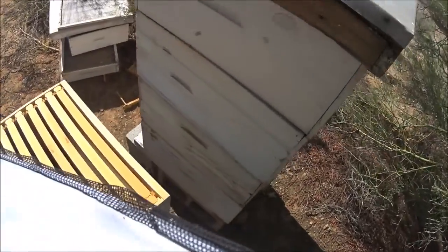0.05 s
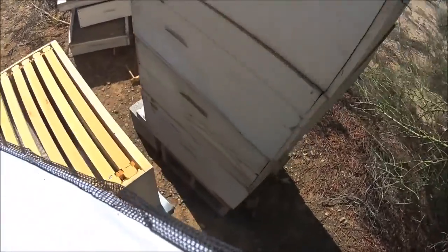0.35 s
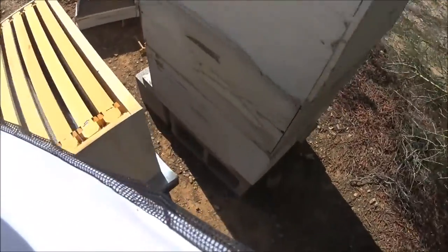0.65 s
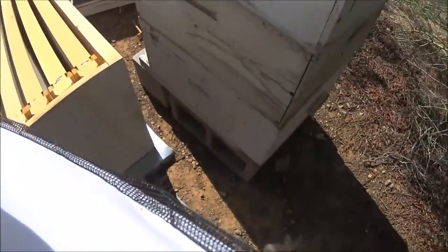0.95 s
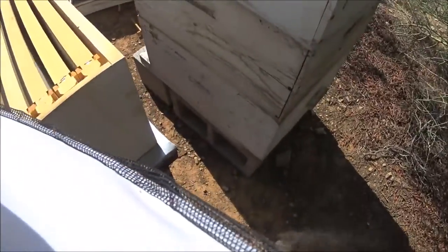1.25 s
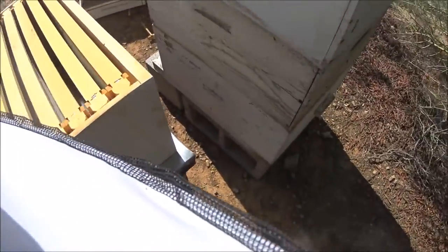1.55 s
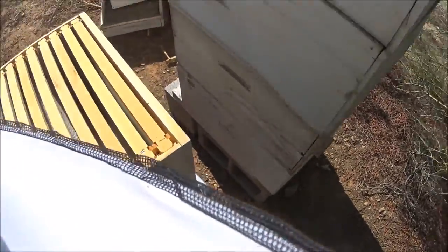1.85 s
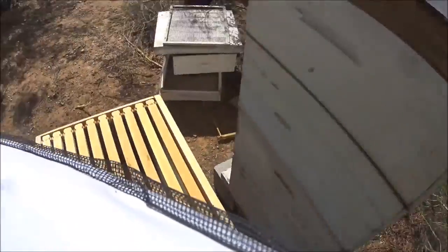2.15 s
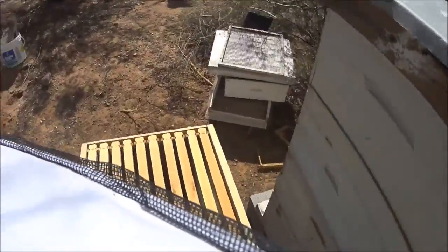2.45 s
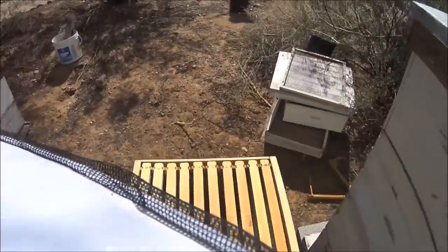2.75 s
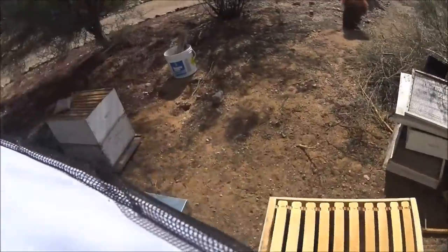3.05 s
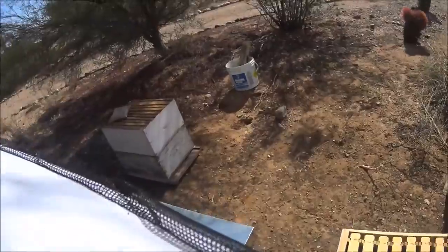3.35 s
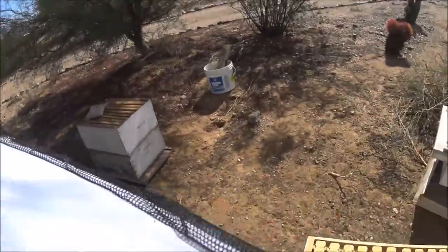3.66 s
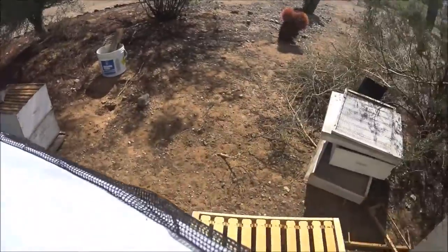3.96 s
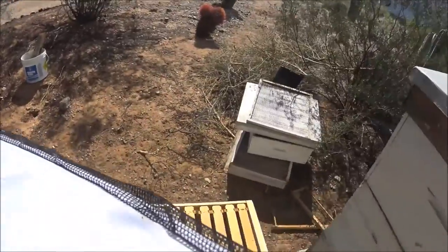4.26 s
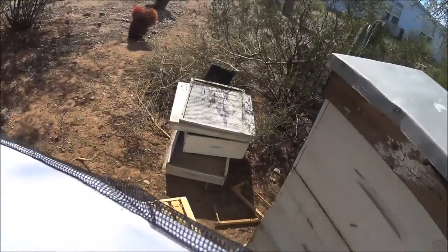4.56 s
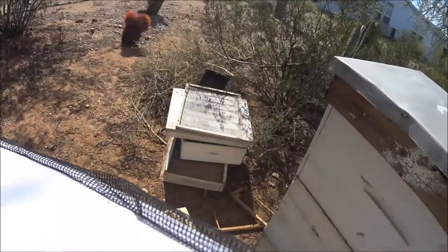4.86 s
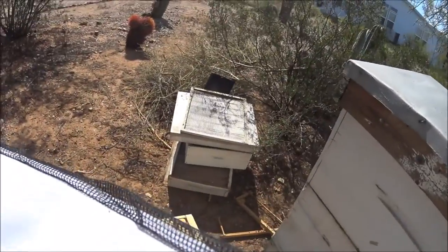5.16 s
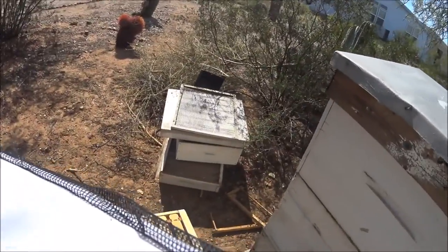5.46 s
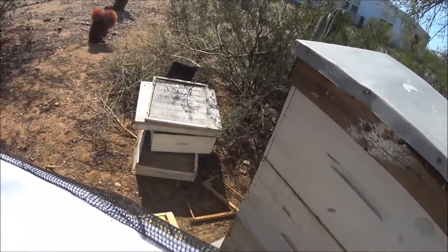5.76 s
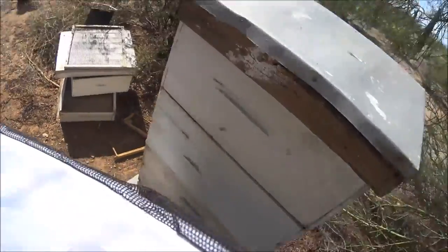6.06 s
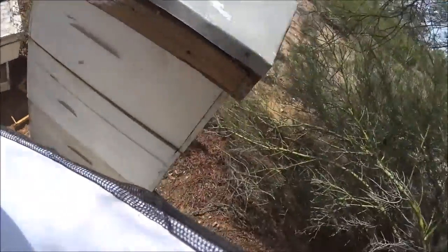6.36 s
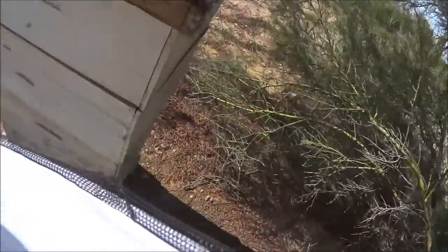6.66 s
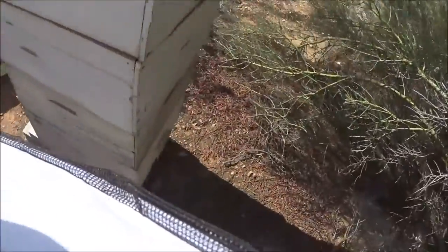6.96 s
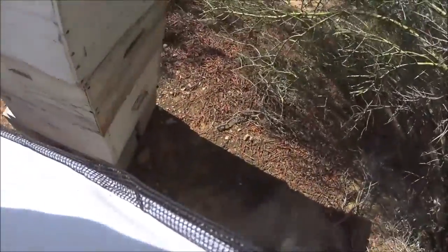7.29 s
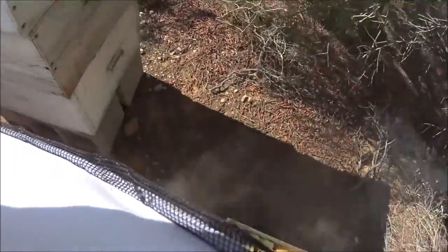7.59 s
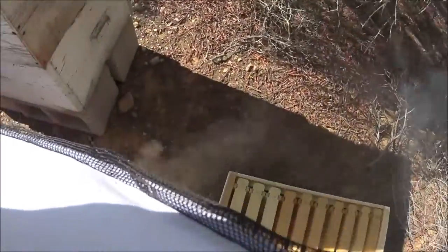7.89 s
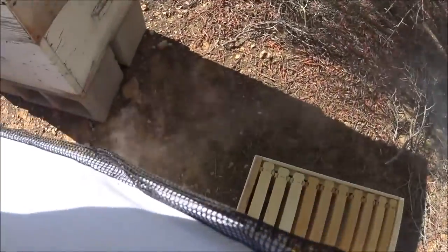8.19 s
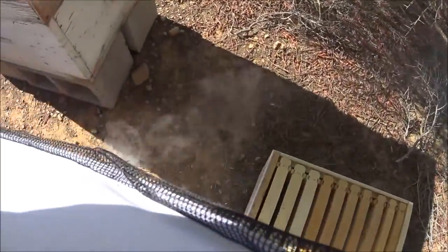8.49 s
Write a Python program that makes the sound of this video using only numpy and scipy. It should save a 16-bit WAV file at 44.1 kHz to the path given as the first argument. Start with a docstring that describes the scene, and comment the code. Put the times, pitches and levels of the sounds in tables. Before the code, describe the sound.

Loose wooden frames knock and scrape in a carried hive box, a suit rustles, and a bee smoker's bellows creak, whistle and puff.

```python
"""A suit rustles and loose frames knock in a wooden box, within arm's reach of the microphone.
A beekeeper is carrying it past the hives in dry, quiet country, with a faint hush all around.
The frames jostle and scrape, ringing the box; hard edges clack, grit snaps and a thin whine passes.
At the end, just as close, the bellows of a smoker creak and whistle, then drive a puff of air
through its can."""
import sys
import numpy as np
from scipy import signal
from scipy.fft import rfft, irfft
from scipy.io import wavfile
from scipy.ndimage import uniform_filter1d

SR = 44100
rng = np.random.default_rng(int(sys.argv[2]) if len(sys.argv) > 2 else 0)


def transcribe(signal):
    """Save signal, clipped to [-1, 1], as a 16-bit WAV file at the path in sys.argv[1]."""
    frames = np.atleast_2d(signal).T
    limited = np.clip(frames, -1, 1)
    pcm = np.round(limited * 32767).astype(np.int16)
    wavfile.write(sys.argv[1], SR, pcm)


N = 376173
TIME = np.arange(N) / SR

# Levels are relative: a source's own level_db is added to those in its table.
# spectra of the distant hush, the suit, the nozzle, an edge contact, the box's weak modes: f/Hz, level/dB
HUSH_SPECTRUM = [(20, 5), (50, -7.5), (100, -10), (200, -13), (400, -18.5), (900, -21), (1350, -19.5),
                 (2800, -23.5), (5500, -25), (11000, -30.5)]
CLOTH_SPECTRUM = [(400, -67), (1300, 11.5), (2000, 9.5), (3300, 3), (5500, 7.5), (8000, -1.5), (11000, -1)]
JET_SPECTRUM = [(100, -10), (190, 17), (300, -6), (950, 1.5), (1500, 9.5), (1950, 0), (2350, 9), (3000, 2),
                (6000, 0), (7000, -2.5), (8200, -14), (11000, -7.5)]
CRACK_SPECTRUM = [(100, -51), (250, 6), (700, -14.5), (1300, 6.5), (3200, 2), (4800, 4.5), (6200, 3),
                  (8000, -4.5), (11000, -3)]
RATTLE_SPECTRUM = [(30, -22), (70, -1), (180, -11.5), (290, -5), (450, -2), (800, -9), (1130, -16.5),
                   (2200, -21), (2900, -27), (5500, -26.5), (11000, -40)]
# stereo width at the microphone, for the hush and the close handling: f/Hz, side over mid/dB
HUSH_SIDE = [(40, -26), (200, -7), (600, 7.5), (2000, 4), (11000, -5)]
HANDLING_SIDE = [(40, -19.5), (250, -15.5), (560, -10.5), (1200, -6), (2000, -7.5), (4000, -8.5),
                 (11000, -7.5)]

# a passing whine, a dragged edge: t/s, hold/s, level/dB, first f/Hz, settled f/Hz, attack/s, release/s
PASSING_WHINE = (5.515, .075, -55, 7550, 7920, .03, .03)
EDGE_SQUEAK = (0.916, .018, -42, 2760, 2650, .014, .02)
# dry grit and twigs snapping: t/s, level/dB, decay/s
SNAPS = [(0.146, -39, 0.03), (0.904, -27.5, 0.011), (0.93, -21.5, 0.0067), (0.968, -24.5, 0.0064),
         (1.134, -36, 0.0034), (1.196, -38, .004), (1.248, -38, 0.0065), (1.34, -37, 0.0028),
         (1.283, -32, 0.0037), (3.687, -30.5, 0.0024), (3.704, -48, 0.0026), (6.433, -42, .003),
         (6.775, -36, .002), (7.654, -35, .002), (7.592, -36, 0.002), (7.699, -37.5, 0.0028),
         (8.092, -35.5, .003), (8.29, -31, 0.012), (8.372, -26, 0.0051), (8.416, -25, .002)]
# the suit rubbing as the arms swing: t/s at the height, level/dB, swell and fade/s
SUIT_RUBS = [(0.13, -44.5, 0.3), (0.31, -37, 0.024), (0.928, -27, 0.028), (1.24, -42.5, 0.18),
             (1.9, -49.5, .15), (4.55, -46, 0.13), (6.05, -49, 0.25), (6.52, -35, 0.068), (8.32, -32, 0.15)]

# air drawn softly through the smoker: t/s, level/dB
SMOKER_DRAUGHT = [(0.29, -44.5), (0.42, -51), (1.4, -52), (2.3, -54.5), (5.1, -60), (7.8, -54)]
# a light and a hard stroke of the bellows:
# t/s, length/s, level/dB, fade/(dB/s), first f/Hz, settled f/Hz, settling/s, hoarseness/dB
BELLOWS_STROKES = [(7.874, 0.41, -38.5, 18, 1504, 1360, 0.0383, -21),
                   (8.305, .25, -30, 32, 1338, 1500, 0.197, -13)]
# a soft and a hard puff: t/s, hold/s, jet level/dB, can level/dB
SMOKER_PUFFS = [(0.0, 0.33, -55.5, -64.5), (8.305, 0.07, -35, -39)]

# modes of the hard edges: f/Hz, level/dB, t60/s
EDGE_MODES = [(1038, -11, 0.07), (1400, -10, 0.15), (1600, -16, 0.3), (1760, -5, 0.072), (2475, 0.5, 0.055),
              (2550, -9, 0.19), (3640, -10, 0.078), (4550, 0, 0.056), (4680, 2, 0.04), (4820, -14, 0.11),
              (4840, -2, 0.06), (5200, -3, 0.066), (5700, -5, 0.071)]
# edges striking: t/s, level/dB, rattle/s, lowpass f/Hz, freedom to ring/dB
EDGE_CLACKS = [(0.334, -16, 0.0026, 1990, -19), (0.341, -20.5, 0.0027, 2000, -25),
               (0.925, -24.5, 0.01, 4000, -9), (5.334, -26, 0.0043, 9000, -4),
               (5.346, -20.5, 0.0049, 9000, 0), (5.381, -21, 0.005, 9000, -5),
               (5.3851, -7, 0.0016, 12000, 0.5), (5.391, -19, 0.0017, 12000, -5),
               (5.409, -14.5, 0.0016, 12000, -4), (5.593, -19.5, 0.015, 5000, 3),
               (5.604, -21.5, 0.02, 2800, 6.5), (8.324, -15.5, 0.011, 9000, -14),
               (8.416, -17.5, 0.0021, 12000, -12)]
# resonances of the hollow walls, and of the box with its frames: f/Hz, width/Hz, level/dB
WALL_MODES = [(390, 35, -3.5), (662, 30, 11.5), (925, 51, -8), (1325, 55, -2), (1710, 70, -5)]
BOX_MODES = [(91, 71, 2), (192.2, 48, 8), (402.4, 15, -1.5), (522, 44, 2.5), (655, 47.5, -1),
             (929, 83, -2.5), (1358, 62, -5.5), (1662, 106, -7.5), (2383, 200, -19)]
# the box shuddering: t/s, level/dB, hold/s
BOX_SHUDDERS = [(2.956, -28, 0.048), (3.691, -39, 0.036), (4.42, -35.5, 0.016)]
# wood sliding on wood: t/s, length/s, level/dB, attack/s
FRAME_SLIDES = [(0.488, 0.076, -42, 0.024), (0.603, 0.04, -40, 0.017), (1.785, 0.51, -54, 0.049),
                (2.775, 0.17, -50.5, 0.037), (2.9, 0.079, -34.5, 0.055), (3.043, 0.13, -44.5, 0.025),
                (3.55, 0.21, -38, 0.11), (3.766, 0.21, -41, 0.067), (4.114, 0.18, -47, 0.1),
                (4.332, 0.16, -47, 0.028), (5.302, 0.15, -50, 0.056), (5.478, 0.16, -50.5, 0.042),
                (5.894, 0.2, -40, 0.15), (6.135, 0.71, -50.5, 0.046), (6.732, 0.055, -51, 0.074),
                (7.488, 0.67, -54.5, 0.076)]
# frames jolting in the box: t/s, level/dB, treble gain/dB, rattle/s
FRAME_JOLTS = [(0.121, -32, 0, 0.022), (0.518, -28.5, 2, 0.023), (0.635, -29.5, 9, 0.0036),
               (0.806, -26.5, 2.5, 0.028), (0.862, -30, -14, 0.0064), (1.037, -33.5, -2, 0.04),
               (1.086, -27.5, 18, 0.0042), (1.222, -35, -29, 0.0043), (1.644, -35, -3, 0.01),
               (1.671, -29.5, 3, 0.028), (1.712, -39.5, 5, 0.0035), (1.825, -30, 1.5, 0.02),
               (1.851, -31, 6, 0.02), (1.898, -31, 2.5, 0.018), (1.942, -29, 1, 0.0079),
               (2.61, -32.5, -5, 0.01), (2.934, -27.5, 8, 0.03), (2.966, -29, 19, 0.013),
               (3.064, -36, -11, 0.016), (3.127, -29.5, -21, 0.0042), (3.22, -39, -13, .007),
               (3.33, -32, 8, 0.008), (3.348, -30.5, -2.5, .023), (3.607, -31, -10, 0.009),
               (3.63, -30, 5, 0.0047), (3.686, -26, 4, 0.0065), (3.701, -25, 4, 0.0076),
               (3.829, -27.5, 10, .022), (3.955, -33.5, 4, 0.011), (3.994, -26, -2, 0.0047),
               (4.071, -32.5, -4, 0.007), (4.328, -29, -10, 0.027), (4.419, -25, 1, 0.014),
               (4.443, -36, -4, 0.0075), (5.228, -41, -14, 0.004), (5.284, -36, -10, 0.016),
               (5.935, -33.5, 1, 0.0073), (6.665, -30.5, 1.5, 0.0084), (6.789, -30.5, -27, 0.039),
               (7.181, -36.5, -4, 0.019), (7.343, -42, 7, 0.0078), (7.486, -32, 12, 0.019),
               (7.525, -27.5, -1.5, 0.027), (7.575, -36, 13, 0.0073), (7.717, -38.5, -11, 0.0042),
               (7.761, -28, 4, 0.029), (7.922, -32, 6, 0.016), (8.054, -35, 17, 0.014)]


def from_db(db):
    """Decibels to gain."""
    return 10 ** (np.asarray(db) / 20)


def rms_one(x):
    """Scale to unit power."""
    return x / np.sqrt(np.mean(x ** 2) + 1e-20)


def loudest_one(x, size=512):
    """Scale a hit so that its loudest moment has unit power."""
    return x / np.sqrt(uniform_filter1d(x ** 2, size).max())


def add(track, s, sound):
    """Mix a sound into a track at time s."""
    at = max(0, int(s * SR))
    track[at:at + len(sound)] += sound[:max(0, N - at)]


def pan(x, db):
    """Place a sound by the level of left over right."""
    return x * from_db(np.array([[db], [-db]]) / 2)


def envelope(s, hold_s, attack_s, release_s):
    """Rises from time s, holds until hold_s later, then dies away."""
    t = TIME - s
    return np.clip(t / attack_s, 0, 1) * np.exp(-np.maximum(t - hold_s, 0) / release_s)


def glide(s, first_hz, settled_hz, settle_s):
    """A pitch that eases from its first value to its settled one."""
    return settled_hz + (first_hz - settled_hz) * np.exp(-np.maximum(TIME - s, 0) / settle_s)


def drift(rate_hz):
    """Smooth random wander of spread 1, drawn every 40 samples."""
    r = np.exp(-80 * np.pi * rate_hz / SR)
    slow = signal.lfilter([1], [1, -2 * r, r * r], rng.standard_normal(N // 40 + 2002))[2000:]
    return np.interp(np.arange(N) / 40, np.arange(len(slow)), rms_one(slow))


def colour(x, spectrum, size=8192):
    """Causal (minimum-phase) filter that follows a spectrum."""
    hz, db = np.transpose(spectrum)
    grid_hz = np.maximum(np.arange(size // 2 + 1) * SR / size, 1)
    gain = from_db(np.interp(np.log(grid_hz), np.log(hz), db))
    cepstrum = irfft(np.log(gain))
    cepstrum[1:size // 2] *= 2
    cepstrum[size // 2 + 1:] = 0
    impulse = irfft(np.exp(rfft(cepstrum)))[:size // 2]
    return signal.oaconvolve(x, impulse)[:len(x)]


def resonate(x, hz, width_hz):
    """One resonance with gain 1 on top."""
    r = np.exp(-np.pi * width_hz / SR)
    poles = [1, -2 * r * np.cos(2 * np.pi * hz / SR), r * r]
    return signal.lfilter(np.array([1, 0, -1]) * (1 - r * r) / 2, poles, x + 1e-18)


def ring_modes(x, modes):
    """Resonances driven together, in alternating polarity."""
    return sum((-1) ** k * from_db(db) * resonate(x, hz, width) for k, (hz, width, db) in enumerate(modes))


def noise_band(hz, widths_hz):
    """Unit-power noise through two resonances in series."""
    first = resonate(rng.standard_normal(N), hz[0], widths_hz[0])
    return rms_one(resonate(first, hz[1], widths_hz[1]))


def grains(per_s, spread_db):
    """Tiny contacts at random moments and of uneven size."""
    sizes = from_db(spread_db * np.minimum(rng.exponential(1, N), 4)) * rng.choice([-1, 1], N)
    return rms_one(sizes * (rng.random(N) < per_s / SR))


def open_air(level_db=-54.5, rumble_db=-60.0, gust_db=3.0):
    """The steady hush of open country, with a low rumble of moving air."""
    hush = from_db(level_db) * rms_one(colour(rng.standard_normal(N), HUSH_SPECTRUM))
    gusts = from_db(rumble_db + gust_db * drift(4.7))
    return hush + gusts * noise_band(hz=(66, 38), widths_hz=(72, 112))


def thin_tone(tone, waver_hz):
    """A thin, wavering tone that swells, glides to its pitch and fades."""
    s, hold_s, db, first_hz, settled_hz, attack_s, release_s = tone
    hz = glide(s, first_hz, settled_hz, settle_s=0.022) + waver_hz * drift(125)
    note = np.sqrt(2) * np.sin(2 * np.pi * np.cumsum(hz) / SR)
    return from_db(db) * envelope(s, hold_s, attack_s, release_s) * note


def grit(level_db=-4.5, fine_per_s=4.0, count=40, size=3000):
    """Dry grit snaps in short, bright bursts, with fainter ones scattered between."""
    out = np.zeros(N)
    moments = np.cumsum(rng.exponential(1, count)) / fine_per_s
    fine_snaps = [(s, db, 0.002) for s, db in zip(moments, rng.normal(-48, 3, count))]
    for s, db, decay_s in SNAPS + fine_snaps:
        add(out, s, from_db(db + level_db) * rng.standard_normal(size) * np.exp(-TIME[:size] / decay_s))
    return resonate(out, hz=13800, width_hz=8000) + resonate(out, hz=6500, width_hz=1260)


def suit_rustle(level_db=-15.5, flutter_db=-2.0, rest_db=-54.5):
    """Close to the microphone, fibres of the suit catch on each other in a fine, uneven hiss."""
    fibres = rms_one(colour(grains(per_s=9100, spread_db=5.0), CLOTH_SPECTRUM))
    swings = sum(from_db(db) * np.exp(-np.abs(TIME - s) / swell_s) for s, db, swell_s in SUIT_RUBS)
    return (from_db(rest_db) + swings) * from_db(level_db + flutter_db * drift(38)) * fibres


def bellows_creak(start_s=7.872, every_s=0.0175, count=23, level_db=-47.0, fade_db_per_s=25.0,
                  fold_hz=2780, sag_hz_per_s=900, width_hz=600, decay_s=0.0058, size=1500):
    """The bellows slip in a quick train of rasps that ring the stiff fold, ever lower and weaker."""
    out = np.zeros(N)
    for k in range(count):
        late, strength, detune = rng.standard_normal(3)
        t = every_s * (k + 0.15 * late)
        rasp = rng.standard_normal(size) * np.exp(-TIME[:size] / decay_s)
        hz = (fold_hz - sag_hz_per_s * t) * (1 + 0.014 * detune)
        db = level_db - fade_db_per_s * t + 3.5 * strength
        fold = resonate(resonate(rasp, hz, width_hz), hz, 2 * width_hz)
        add(out, start_s + t, from_db(db) * loudest_one(fold))
    return signal.sosfilt(signal.butter(6, 3400, fs=SR, output="sos"), out)


def smoker_whistle(breathy=0.54, width_hz=100, waver_hz=12, draught_db=-9.0):
    """Each stroke blows one rough note, hoarser when hard; a faint draught sounds even at rest."""
    draught = from_db(np.interp(TIME, *np.transpose(SMOKER_DRAUGHT)) + draught_db)
    out = draught * noise_band(hz=(1320, 1750), widths_hz=(65, 630))
    hoarse = noise_band(hz=(1540, 1540), widths_hz=(210, 330))
    for s, length_s, db, fade_db_per_s, first_hz, settled_hz, settle_s, hoarse_db in BELLOWS_STROKES:
        hz = glide(s, first_hz, settled_hz, settle_s) + waver_hz * drift(40.9)
        phase = 2 * np.pi * np.cumsum(hz) / SR
        note = (1 + breathy * drift(width_hz)) * np.sin(phase) + breathy * drift(width_hz) * np.cos(phase)
        fade = from_db(-fade_db_per_s * np.maximum(TIME - s, 0))
        pressure = from_db(db) * envelope(s, length_s, attack_s=0.01, release_s=0.017)
        out += pressure * (fade * rms_one(note) + from_db(hoarse_db) * hoarse)
    return out


def smoker_puffs(sputter_db=2.0, attack_s=0.0083):
    """Air rasps through the nozzle and sounds the hollow of the can."""
    out = np.zeros(N)
    sputter = from_db(sputter_db * drift(56))
    jet = sputter * rms_one(colour(grains(per_s=4000, spread_db=0.5), JET_SPECTRUM))
    can = noise_band(hz=(435, 530), widths_hz=(95, 180))
    for s, hold_s, jet_db, can_db in SMOKER_PUFFS:
        out += from_db(jet_db) * jet * envelope(s, hold_s, attack_s, release_s=0.11)
        out += from_db(can_db) * can * envelope(s, hold_s, attack_s, release_s=0.075)
    return out


def edge_clacks(level_db=-13.0, tail_db=-16.5, tail_s=0.033, ring_db=-3.5, size=13230):
    """A sharp contact, a few milliseconds of chatter, then the ring of the struck edge."""
    out, t = np.zeros(N), TIME[:size]
    for s, db, rattle_s, dull_hz, free_db in EDGE_CLACKS:
        contact = np.exp(-t / rattle_s) + from_db(tail_db + free_db) * np.exp(-t / tail_s)
        onset = 1 - np.exp(-10 * t / rattle_s)   # a longer rattle also starts more softly
        crack = colour(rng.standard_normal(size) * contact * onset, CRACK_SPECTRUM)
        ring = np.zeros(size)
        for hz, mode_db, t60 in EDGE_MODES:
            decay = from_db(mode_db + rng.normal(0, 2) - 60 * t / t60)
            ring += decay * np.sin(2 * np.pi * (hz * t + rng.random()))
        clack = loudest_one(crack) + from_db(ring_db + free_db) * ring * onset
        softness = signal.butter(1, dull_hz, fs=SR)   # softer contacts are duller
        add(out, s, from_db(db + level_db) * signal.lfilter(*softness, clack))
    return out


def box_shudders(level_db=-5.0, edge_s=0.0044):
    """A short run of hard slips rings the hollow walls, then stops."""
    out, slips = np.zeros(N), grains(per_s=770, spread_db=2.5)
    for s, db, hold_s in BOX_SHUDDERS:
        run = slips * envelope(s, hold_s, edge_s, edge_s)
        out += from_db(db + level_db) * loudest_one(ring_modes(run, WALL_MODES))
    return out


def box_response(rattle_db=-4.0, size=3072):
    """The box's answer to one tap: its main resonances over a bed of many weak ones."""
    tap = signal.unit_impulse(size)
    body = signal.sosfilt(signal.butter(4, 2500, fs=SR, output="sos"), ring_modes(tap, BOX_MODES))
    return body + from_db(rattle_db) * colour(tap, RATTLE_SPECTRUM)


def frame_scrapes(box, level_db=-1.5, judder_db=2.5, rest_db=-60.0):
    """Frames slide in small uneven slips that sound through the box; they never quite rest."""
    slips = grains(per_s=1600, spread_db=3.0) * from_db(judder_db * drift(35))
    slides = sum(from_db(db) * envelope(s, length_s, attack_s, release_s=0.04)
                 for s, length_s, db, attack_s in FRAME_SLIDES)
    wood = rms_one(signal.oaconvolve(slips, box)[:N])
    return from_db(level_db) * (from_db(rest_db) + slides) * wood


def frame_knocks(box, level_db=-7.0, rise_s=0.00096, thump_s=0.011, thump_db=-11.0, size=8192):
    """Each jolt sets the loose frames chattering on the walls; the heavy box rocks with a low thump."""
    out, t = np.zeros(N), TIME[:size]
    chatter = grains(per_s=3000, spread_db=2.0)
    rocking = noise_band(hz=(176, 176), widths_hz=(84, 84))
    treble = signal.butter(1, 800, "high", fs=SR)
    onset = 1 - np.exp(-t / rise_s)
    for s, db, treble_db, rattle_s in FRAME_JOLTS:
        at = int(s * SR)
        contacts = chatter[at:at + size] * onset * np.exp(-t / rattle_s)
        hit = signal.fftconvolve(contacts, box)[:size]
        hit += (from_db(treble_db) - 1) * signal.lfilter(*treble, hit)
        thump = rocking[at:at + size] * t / thump_s * np.exp(-t / thump_s)
        knock = loudest_one(hit) + from_db(thump_db) * loudest_one(thump)
        add(out, s, from_db(db + level_db) * knock)
    return out


def close_handling():
    """Everything near the microphone that rubs, rattles and hisses."""
    box = box_response()
    wood = frame_knocks(box) + box_shudders() + frame_scrapes(box) + edge_clacks()
    return wood + grit() + bellows_creak() + smoker_puffs() + suit_rustle()


def scene():
    """Box and suit at arm's length near the centre, the whistle a little left, the hush all around."""
    side = np.array([[1], [-1]])
    handling = close_handling() + side * colour(close_handling(), HANDLING_SIDE)
    outdoors = open_air() + side * colour(open_air(), HUSH_SIDE)
    tones = thin_tone(EDGE_SQUEAK, waver_hz=34.8) + thin_tone(PASSING_WHINE, waver_hz=13)
    return outdoors + tones + pan(smoker_whistle(), db=4.0) + pan(handling, db=0.6)


def record(dry):
    """The stereo microphone's signal, cut steeply above 11150 Hz."""
    return signal.sosfilt(signal.ellip(12, 0.1, 70, 11150, fs=SR, output="sos"), dry)


dry = scene()
out = record(dry)
transcribe(out)
```